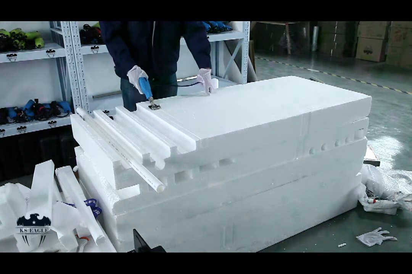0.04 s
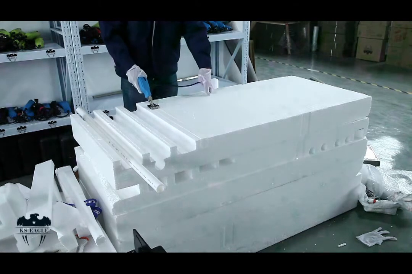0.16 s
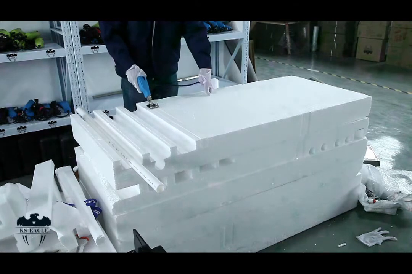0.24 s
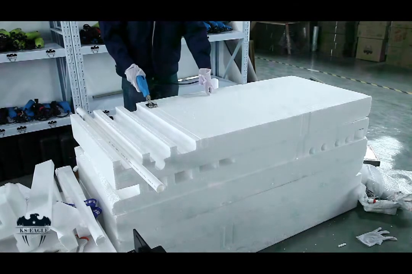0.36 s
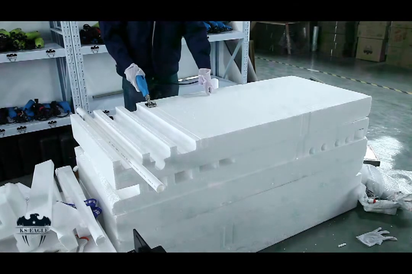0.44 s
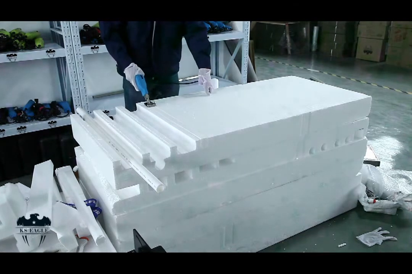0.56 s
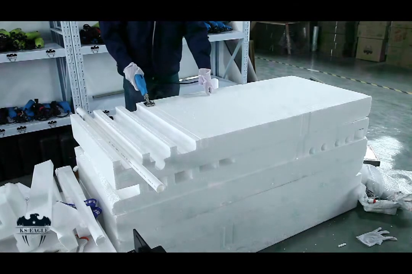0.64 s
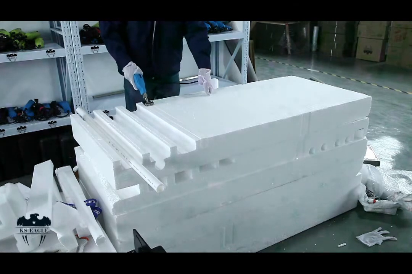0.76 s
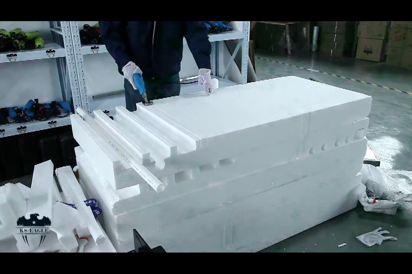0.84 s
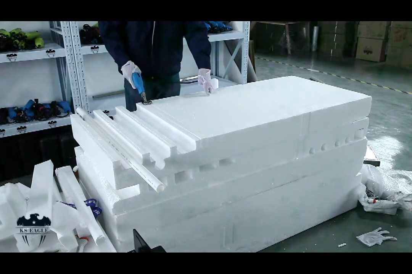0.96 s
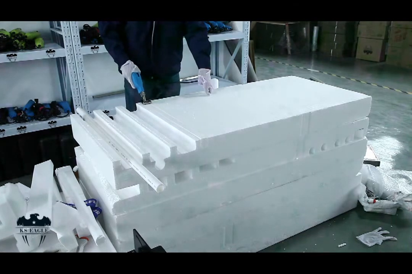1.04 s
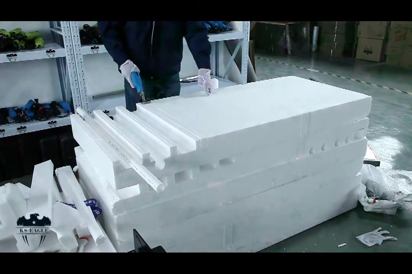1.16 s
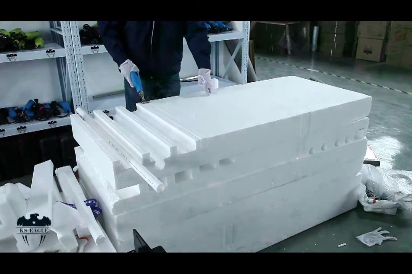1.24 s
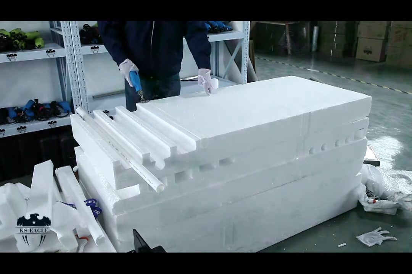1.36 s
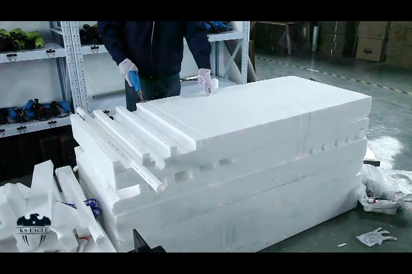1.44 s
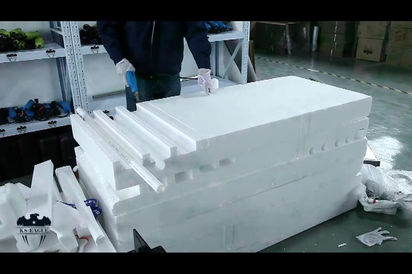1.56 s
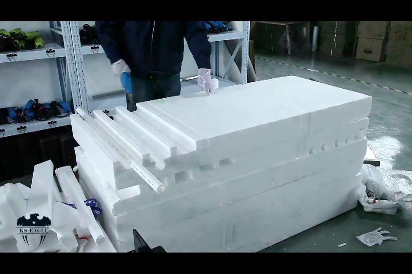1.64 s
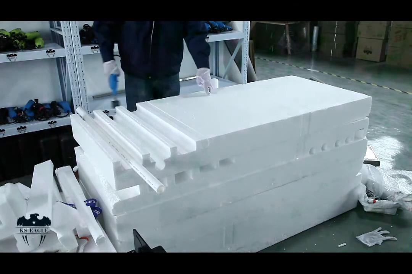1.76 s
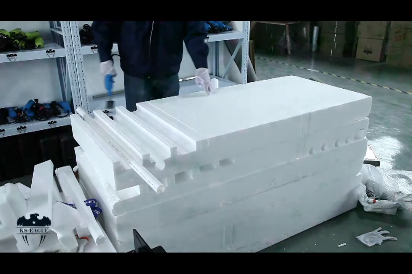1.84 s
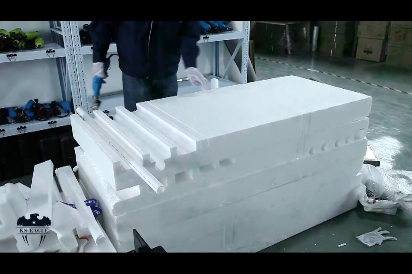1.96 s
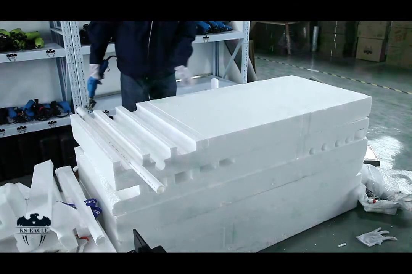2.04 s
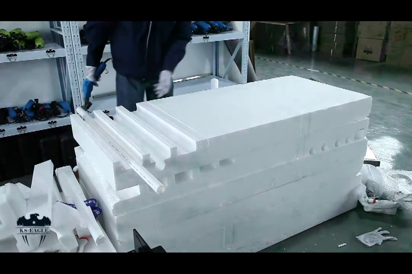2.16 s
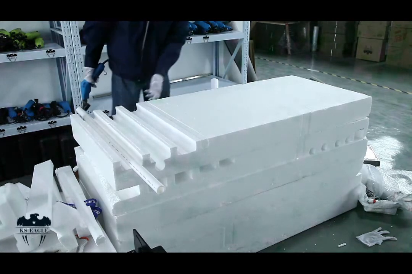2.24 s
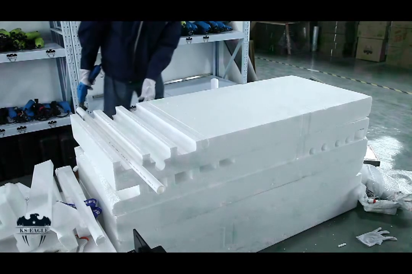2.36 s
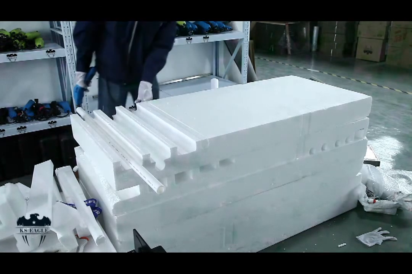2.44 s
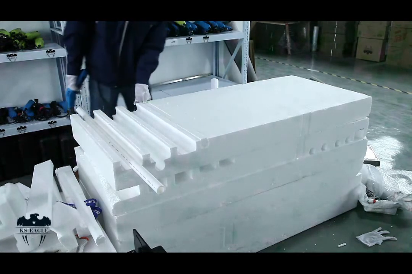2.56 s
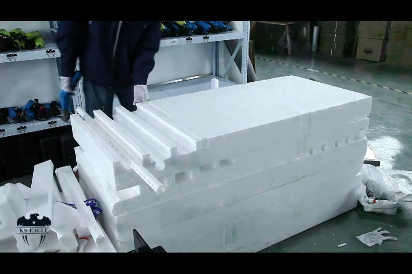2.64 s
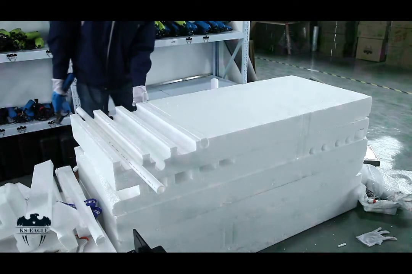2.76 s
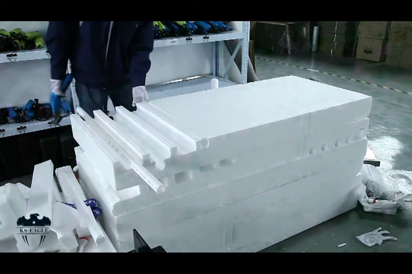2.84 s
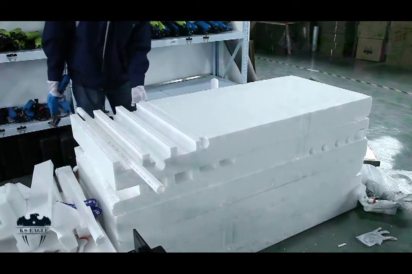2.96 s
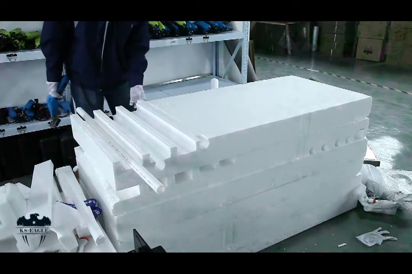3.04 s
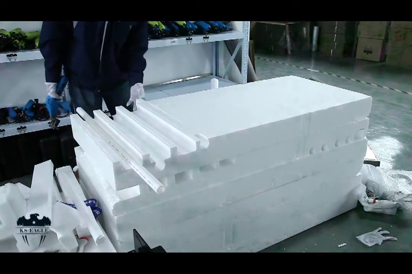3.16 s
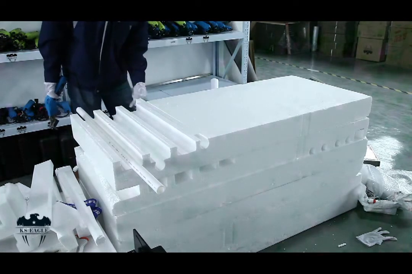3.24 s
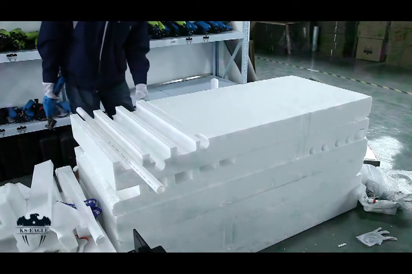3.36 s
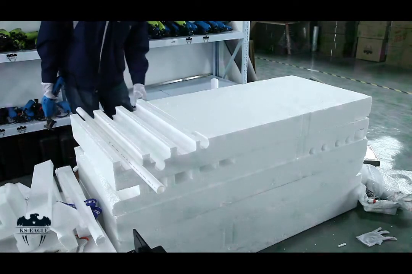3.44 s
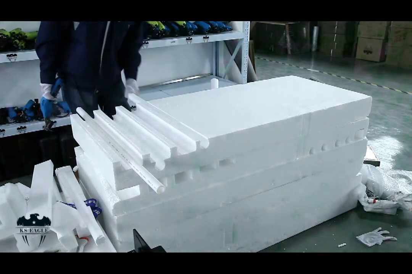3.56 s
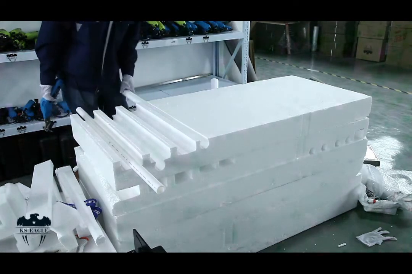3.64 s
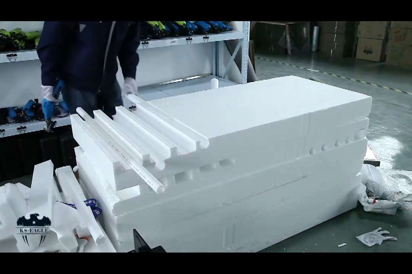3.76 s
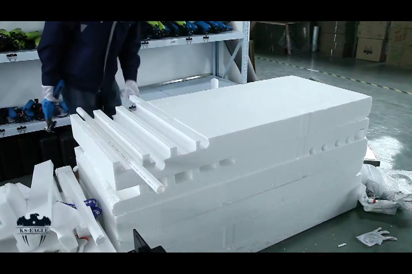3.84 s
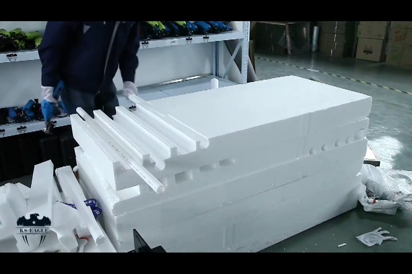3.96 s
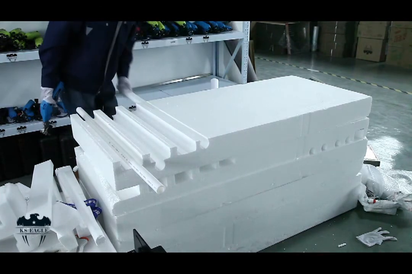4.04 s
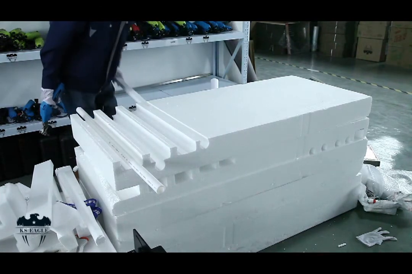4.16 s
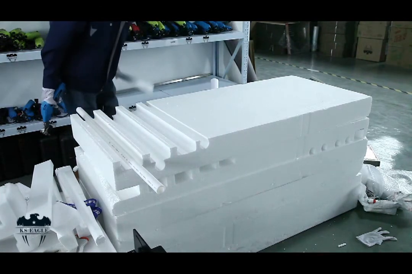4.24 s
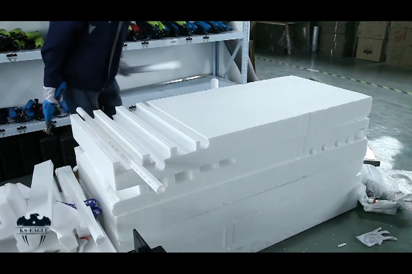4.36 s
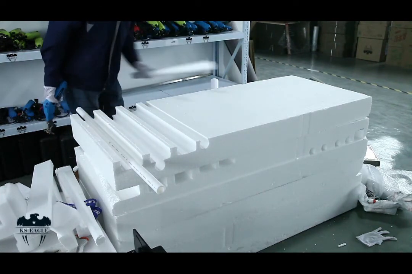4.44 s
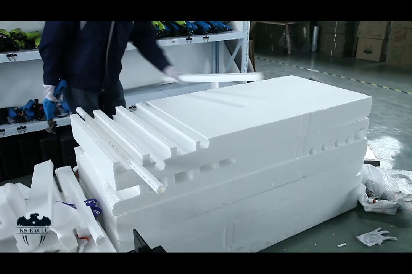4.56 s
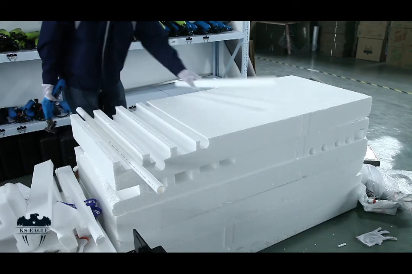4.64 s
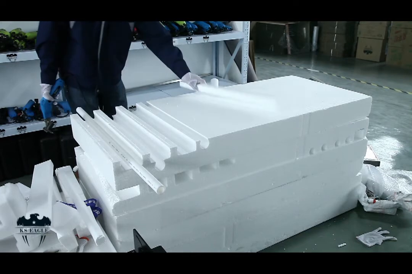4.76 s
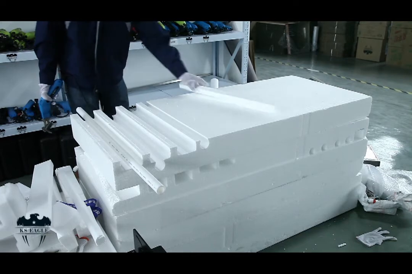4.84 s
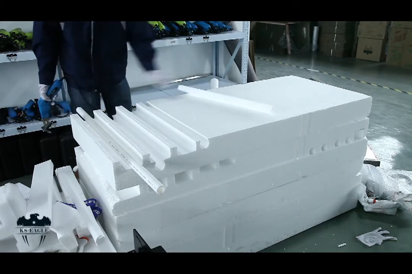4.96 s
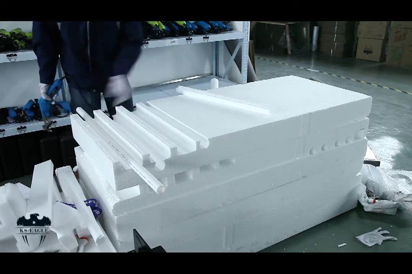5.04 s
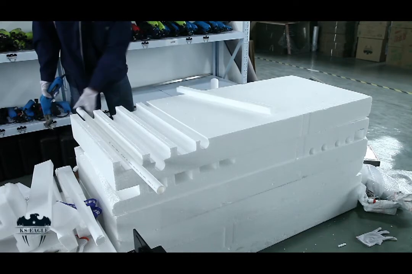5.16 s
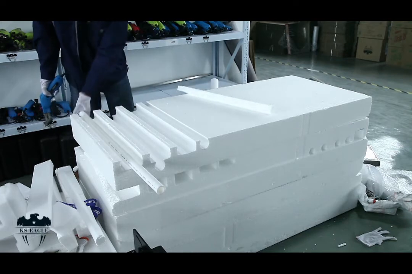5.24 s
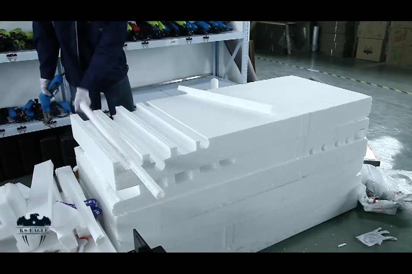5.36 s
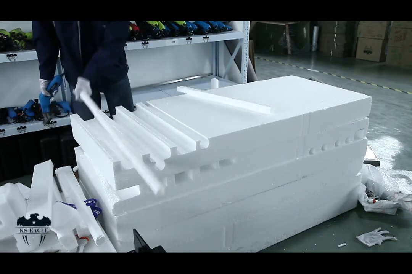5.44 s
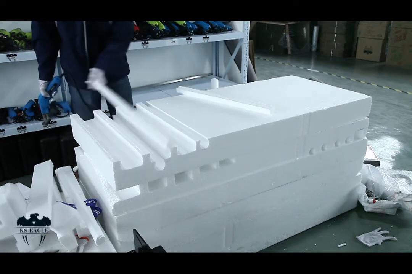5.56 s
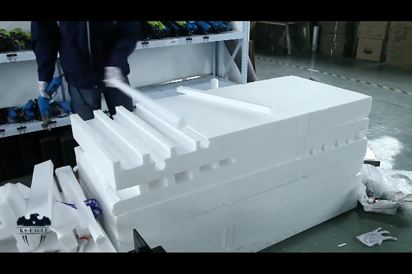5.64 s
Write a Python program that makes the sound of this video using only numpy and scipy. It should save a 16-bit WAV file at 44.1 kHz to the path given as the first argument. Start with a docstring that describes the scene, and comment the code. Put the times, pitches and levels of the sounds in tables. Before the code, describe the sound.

A hot blade fizzes softly through foam and snaps free, then loud squeaky polystyrene scrapes, a clattering light landing and one more short rub, in an echoing warehouse.

```python
"""Hot knife through polystyrene foam

In a warehouse a hot knife fizzes through a foam block, as cells burst, and leaves with a squeak of fast slips.
The strip is dragged free in four scrapes: random slips ring foam beads, body and fine grit.
Tossed onto the block, it lands as decaying modes and thuds; another short drag and light brushes follow.
Filtered noise reverberates for about a second over steady air and a wavering low hum."""
import sys
import numpy as np
from scipy import signal
from scipy.fft import rfft, irfft
from scipy.io import wavfile

SR = 44100
rng = np.random.default_rng(int(sys.argv[2]) if len(sys.argv) > 2 else 0)


def transcribe(signal):
    """Save signal, clipped to [-1, 1], as a 16-bit WAV file at the path in sys.argv[1]."""
    frames = np.atleast_2d(signal).T
    limited = np.clip(frames, -1, 1)
    pcm = np.round(limited * 32767).astype(np.int16)
    wavfile.write(sys.argv[1], SR, pcm)


N = 251811
TIME = np.arange(N) / SR

# Steady air of the hall: (frequency [Hz], relative density [dB per Hz])
HALL_AIR_SPECTRUM = [(30, -35), (60, -10), (100, -4), (200, -2.5), (280, -2), (420, -1.5), (650, -7),
                     (1000, -7.5), (2100, -10.5), (4000, -9), (6400, -5), (8000, -7.5), (10000, -18.5),
                     (15000, -25.5)]
HALL_AIR_RMS_DB = -67.5
# Hum while the knife cuts, and of the hall: (frequency [Hz], mean level [dB rms])
KNIFE_HUM_LINES = [(242, -75.5)]
HALL_HUM_LINES = [(150.7, -77), (231.5, -83.5), (656.8, -83.5)]

# Bursting cells: (frequency [Hz], relative density [dB per Hz])
FIZZ_SPECTRUM = [(60, -18), (150, -52), (270, -21), (500, -12.5), (800, -9.5), (2000, -8.5), (4500, -4.5),
                 (8000, -3), (10000, 3.5), (12000, 2), (14000, -6), (16000, -13.5)]
CUT_END_S = 1.535
FIZZ_START_DB, FIZZ_GROWTH_DB_PER_S = -56.3, 1.0
# Hollow of the cut: (multiple of slot pitch [ratio], width [Hz], relative level [dB])
SLOT_RESONANCES = [(1, 275, 0.5), (1.4, 510, -0.5), (2.151, 384, -2), (2.428, 300, -4)]
SLOT_START_HZ, SLOT_SAG_HZ_PER_S = 1500, 135
SLOT_PEAK_S, SLOT_PEAK_DB, SLOT_SWELL_DB_PER_S, SLOT_FADE_DB_PER_S = 0.94, -65.5, 14.5, 10.5
SLOT_LAG_S_PER_MULTIPLE = 0.18   # higher resonances peak later
# Melt spitting on the blade: (time [s], level [dB])
BLADE_SPITS = [(0.014, -52), (0.05, -57), (.1, -53.5), (0.427, -49.5)]
SPIT_S = 0.03
# Sputter as the blade breaks through the edge
BREAK_START_S, BREAK_LENGTH_S, BREAK_DB = 1.445, 0.089, -51
# Last cell walls snapping: (time [s], peak level [dB])
WALL_SNAPS = [(1.4364, -26.5), (1.454, -35), (1.4700, -22.5), (1.5287, -29.5)]
PUFF_S, PUFF_RE_SNAP_DB = .008, -18.5

# Reverberation: (frequency [Hz], t60 [s])
HALL_DECAY = [(100, 1.0), (500, 1.0), (1500, 0.99), (4000, 0.84), (7000, 0.52), (10000, 0.66),
              (15000, 0.51)]
FAR_WALL_S = 0.114

# Dull knocks on the block: (time [s], blow level [dB], contact cut-off [Hz])
BLOCK_KNOCKS = [(.497, -53, 140), (1.47, -56, 346), (1.79, -48, 1500), (4.785, -50.5, 700),
                (5.28, -54, 100)]
# Clear modes of the block: (frequency [Hz], relative level [dB], t60 [s])
BLOCK_MODES = [(79, -22, .14), (170, -7.5, 0.091), (240, -10, 0.032), (311, -13, 0.051), (395, -4.5, 0.058),
               (620, -8, 0.037)]
# Dense modes of the block: (frequency [Hz], relative density [dB per Hz])
BLOCK_THUD_SPECTRUM = [(35, -13), (80, -16), (180, 0.5), (420, 0), (520, -18.5), (650, -8.5), (900, -13),
                       (2000, -30), (8000, -26)]
# Rebound rule: (gap [s], gap growth [ratio], loss [dB], highest contact cut-off [Hz])
KNOCK_REBOUND = (.028, 1, 7, 250)
CRUSH_S, CRUSH_RE_KNOCK_DB = 0.0064, -8   # beads crushed by a knock

# Foam beads ringing: (frequency at pitch ratio 1 [Hz], width [Hz], relative level [dB])
BEAD_MODES = [(6160, 660, -0.5), (6690, 250, -2.5), (7270, 1000, 2), (5000, 670, -9.5), (8700, 6100, -20.5)]
# Body of rubbed foam: (frequency [Hz], relative density [dB per Hz])
RUB_SPECTRUM = [(50, -19), (180, -6.5), (400, -6), (560, -8.5), (920, -1.5), (1350, -7), (1800, -2),
                (3000, -0.5), (4200, 1), (6000, 0), (9000, -6), (15000, -30)]
# Fine torn grit: (frequency [Hz], relative density [dB per Hz])
GRIT_SPECTRUM = [(3000, -42), (7000, -9), (9500, 4), (11500, -3.5), (13500, -6.5), (16000, -24)]
# Glove and loose strip on foam: (time [s], length [s], bead level [dB], grit re beads [dB])
FOAM_BRUSHES = [(1.92, 0.081, -68, -6), (2.017, 0.088, -71, -11), (2.268, 0.071, -69.5, -26),
                (2.525, 0.04, -58, -11), (2.674, 0.23, -71, -10), (4.214, 0.16, -58, -18),
                (4.367, 0.19, -64, -7.5), (4.585, 0.03, -65.5, -6), (5.063, 0.17, -63.5, -15),
                (5.306, 0.11, -61.5, -40), (5.474, .16, -68.5, -26)]
# Foam catching and letting go: (time [s], bead level [dB])
FOAM_SNAGS = [(1.604, -53), (2.491, -58), (2.519, -56), (2.65, -54.5), (2.900, -39), (3.042, -36.5),
              (3.373, -49.5), (3.398, -45.5), (3.492, -39), (3.577, -39), (3.764, -49), (4.113, -40),
              (4.760, -50)]
# Length at the reference level; harder snags last longer, by a power of their strength
SNAG_S, SNAG_REF_DB, SNAG_STRETCH_POWER = .011, -50, 0.66
SNAG_GRIT_DB = -14
TOUCH_GRIT_TOP_HZ, TOUCH_BODY_LOW_HZ = 12500, 450

# Slip rate of the squeak: (at first [per s], at last [per s])
SQUEAK_SLIPS_PER_S = (760, 1650)
SQUEAK_START_S, SQUEAK_LENGTH_S, SQUEAK_DB = 1.580, .017, -40.5

# Foam dragged on foam: (start [s], rise [s], hold [s], release [s], bead level before tightening [dB],
# bead pitch [ratio], body at reference force [dB], body low edge [Hz], held strip ring re body [dB],
# freed strip ring re body [dB], grit at reference force [dB], room send [dB])
FOAM_DRAGS = [(2.752, .148, 0.19, 0.04, -38.5, 0.94, -16, 610, -7.5, -25, -14.5, -9.5),
              (3.387, 0.0049, 0.2, 0.18, -41.5, 0.99, -13, 55, -13.5, -21, -10.5, -12.5),
              (3.811, 0.035, 0.0069, 0.012, -44.5, 1, -14.5, 60, -21, -26, -15, -1),
              (3.872, .11, 0.13, 0.11, -38, 0.99, -12, 160, -24, -20, -5, -5),
              (5.214, 0.028, 0.03, 0.023, -52, 0.83, -12.5, 1700, -30, -26, -30, -2.5)]
DRAG_RANGE_DB, TIGHTEN_DB_PER_S = 17, 9.5
DRAG_EASE_IN_SHARE = 0.11   # of the rise
DRAG_SLIPS_PER_S = 9000
FORCE_REF_DB = -25.5   # drag level counted as reference force
FREED_HZ, FREED_WIDTH_HZ = 1182, 300

# Strip landing on one end, then the other, then a softer echo of the blow from the far wall:
# (time [s], blow level [dB], contact cut-off [Hz])
STRIP_BLOWS = [(4.760, -40, 2820), (4.785, -40, 5000), (4.885, -47.5, 1410)]
# Clear modes of the strip: (frequency [Hz], relative level [dB], t60 [s])
STRIP_MODES = [(287, -11.5, 0.059), (389, -15.5, 0.1), (634, -6.5, 0.063), (798, -9.5, 0.045),
               (1150, -0.5, 0.038), (1650, -6, 0.0096), (2350, -11, .0028)]
# Dense modes of the strip: (frequency [Hz], relative density [dB per Hz])
STRIP_THUD_SPECTRUM = [(50, -15), (130, -5), (230, -0.5), (480, -4), (620, -1.5), (950, -5), (1200, -1),
                       (1700, -7.5), (3000, -18.5), (5000, -11), (9000, -9), (15000, -61)]
# Chatter rule: (first gap [s], gap growth [ratio], loss per touch [dB], highest contact cut-off [Hz])
LANDING_CHATTER = (.003, 1.8, 2.5, 1600)
# Far end slapping down flat: (time [s], peak level [dB])
STRIP_SLAPS = [(4.7851, -23.5), (4.7869, -32)]
# Slap colour: (frequency [Hz], relative density [dB per Hz])
SLAP_SPECTRUM = [(100, -17), (300, -19), (700, -1), (1200, 0), (3000, -2.5), (5000, -10), (8000, -16),
                 (15000, -42)]

CUTOFF_HZ = 15600


def from_db(db):
    """Decibels to gain."""
    return np.exp(np.asarray(db) * (np.log(10) / 20))


def rms_one(x):
    """Scale to unit rms."""
    return x / np.sqrt(np.mean(x ** 2) + 1e-20)


def butter(x, order, hz, kind="low"):
    """Butterworth filter."""
    return signal.sosfilt(signal.butter(order, hz, kind, fs=SR, output="sos"), x)


def at_hz(points, hz):
    """Read a table on a log-frequency axis."""
    f, value = np.transpose(points)
    return np.interp(np.log(np.maximum(hz, 1)), np.log(f), value)


def gate(start_s, end_s, edge_s):
    """One between two times, with edges centred on them."""
    return np.clip(np.minimum(TIME - start_s, end_s - TIME) / edge_s + .5, 0, 1)


def drift(knots_per_s):
    """Smooth random wander, rms 1."""
    knots = rng.standard_normal(int(N / SR * knots_per_s) + 3)
    return rms_one(np.interp(TIME * knots_per_s, np.arange(len(knots)), knots))


def colour(x, spectrum, size=8192):
    """Causal minimum-phase filter with the given spectrum; rms 1."""
    bins_hz = np.arange(size // 2 + 1) * SR / size
    cepstrum = irfft(np.log(from_db(at_hz(spectrum, bins_hz))))
    # Doubling the causal half of the cepstrum gives minimum phase
    kernel = irfft(np.exp(2 * rfft(cepstrum[:size // 2], size)))[:size // 2]
    return rms_one(signal.oaconvolve(x, kernel)[:N])


def resonate(x, hz, width_hz):
    """Two-pole resonance with peak gain near 1."""
    r = np.exp(-np.pi * width_hz / SR)
    numerator = np.array([1, 0, -1]) * (1 - r * r) / 2
    denominator = [1, -2 * r * np.cos(2 * np.pi * hz / SR), r * r]
    return signal.lfilter(numerator, denominator, x + 1e-18)


def resonate_twice(x, hz_1, hz_2, width_hz):
    """Two resonances in series."""
    return resonate(resonate(x, hz_1, width_hz), hz_2, width_hz)


def random_signs():
    """A random sign per sample."""
    return rng.choice([-1, 1], N)


def grains(per_s, spread_db):
    """Clicks at random moments, mostly small, a few large."""
    sizes = from_db(spread_db * np.minimum(rng.exponential(1, N), 4)) * random_signs()
    return sizes * (rng.random(N) < per_s / SR)


def bursts(rows, edge_share):
    """Envelope of short swells, powers added."""
    power = np.zeros(N)
    for start_s, length_s, db in rows:
        span = slice(max(int((start_s - length_s) * SR), 0), int((start_s + 2 * length_s) * SR))
        to_edge_s = np.minimum(TIME[span] - start_s, start_s + length_s - TIME[span])
        swell = np.clip(to_edge_s / (length_s * edge_share) + .5, 0, 1)
        power[span] += (from_db(db) * swell) ** 2
    return np.sqrt(power)


def hum(lines, waver_db):
    """Tones with randomly wavering levels."""
    tones = 0
    for hz, db in lines:
        gain = from_db(db + waver_db * drift(11.0))
        tones = tones + gain * np.sqrt(2) * np.sin(2 * np.pi * hz * TIME)
    return tones


def background():
    """Coloured noise for the air; the knife's hum gives way to the hall's three tones."""
    air = from_db(HALL_AIR_RMS_DB) * colour(rng.standard_normal(N), HALL_AIR_SPECTRUM)
    knife_hum = hum(KNIFE_HUM_LINES, 0.74) * gate(-1, 1.607, 0.05)
    return air + knife_hum + hum(HALL_HUM_LINES, 0.7) * gate(1.55, 7, 0.22)


def gliding_band(centre_hz, width_hz):
    """Low-passed complex noise shifted to a moving centre; rms 1."""
    air = rng.standard_normal(N) + 1j * rng.standard_normal(N)
    air = butter(air, 2, width_hz / 2)
    return rms_one(np.real(air * np.exp(2j * np.pi * np.cumsum(centre_hz) / SR)))


def slot_hiss():
    """Vapour hisses through the slot; its resonances waver and sag as the cut lengthens."""
    slot_hz = SLOT_START_HZ - SLOT_SAG_HZ_PER_S * TIME
    hiss = 0
    for multiple, width_hz, db in SLOT_RESONANCES:
        late_s = TIME - SLOT_PEAK_S - SLOT_LAG_S_PER_MULTIPLE * (multiple - 1)
        drop_db = np.maximum(-SLOT_SWELL_DB_PER_S * late_s, SLOT_FADE_DB_PER_S * late_s)
        band = gliding_band(multiple * slot_hz * (1 + .028 * drift(9)), width_hz)
        hiss = hiss + from_db(db) * from_db(SLOT_PEAK_DB - drop_db) * band
    return hiss


def crack(rows, spectrum):
    """Sharp pulses of one colour, each with its peak level."""
    pulse = colour(1.0 * (TIME == 0), spectrum)[:SR // 20]
    clicks = np.zeros(N)
    clicks[[round(s * SR) for s, db in rows]] = from_db([db for s, db in rows])
    return np.convolve(clicks, pulse / np.abs(pulse).max())[:N]


def hot_knife():
    """Tiny cells burst on the blade; vapour hisses, melt spits and the last walls snap."""
    fizz = from_db(FIZZ_START_DB + FIZZ_GROWTH_DB_PER_S * TIME) * colour(grains(16000, 2.2), FIZZ_SPECTRUM)
    cutting = (fizz + slot_hiss()) * gate(-1, CUT_END_S, 0.0068)
    breaking = bursts([(BREAK_START_S, BREAK_LENGTH_S, BREAK_DB)], 0.13)
    spits = [(s, SPIT_S, db) for s, db in BLADE_SPITS]
    puffs = [(s - PUFF_S / 2, PUFF_S, db + PUFF_RE_SNAP_DB) for s, db in WALL_SNAPS]
    sputter_level = np.hypot(breaking, bursts(spits + puffs, 0.28))
    sputter = sputter_level * colour(grains(14000, 3.0), FIZZ_SPECTRUM)
    return cutting + sputter + crack(WALL_SNAPS, FIZZ_SPECTRUM)


def hall(x):
    """Diffuse noise tail, shorter in the treble, with one swell as the far wall answers."""
    t = TIME[:3 * SR // 2]
    edges_hz = np.geomspace(50, 16000, num=13)
    white, tail = rng.standard_normal((2, len(t))), 0
    # Neighbouring bands use different noise
    for k, (low, high) in enumerate(zip(edges_hz, edges_hz[1:])):
        band = butter(white[k % 2], 2, [low, high], "band")
        tail = tail + band * from_db(-60 * t / at_hz(HALL_DECAY, np.sqrt(low * high)))
    far_wall = 1 + 0.5 * np.exp(-((t - FAR_WALL_S) / 0.0045) ** 2)
    tail = butter(tail * np.clip(t / 0.012, 0, 1) * far_wall, 2, 8500)
    return signal.fftconvolve(x, tail * np.sqrt(2 * np.log(1000) / SR))[:N]


def bounced(hits, rule, count):
    """Add weaker touches, their contact cut-off capped, after every hit."""
    gap_s, growth, loss_db, top_hz = rule
    delays_s = np.cumsum(gap_s * growth ** np.arange(count))
    touches = list(hits)
    for s, db, hz in hits:
        for k, delay_s in enumerate(delays_s):
            touches.append((s + delay_s, db - loss_db * (k + 1), min(hz, top_hz)))
    return touches


def strike(hits, modes, thud, thud_db, thud_t60, lowest_hz):
    """Soft contacts excite clear modes and a short dense thud; a light body radiates no deep bass."""
    out = np.zeros(N)
    t = TIME[:SR // 4]
    hz, mode_db, t60 = np.transpose(modes)[:, :, None]
    rings = np.sin(2 * np.pi * hz * t) * from_db(mode_db - 60 * t / t60)
    dense = colour(rng.standard_normal(N), thud)
    thud_decay = from_db(thud_db - 60 * t / thud_t60)
    signs = (-1) ** np.arange(len(modes))
    for s, db, contact_hz in hits:
        span = slice(round(s * SR), round(s * SR) + len(t))
        mode_gains = signs * from_db(4.0 * rng.standard_normal(len(modes)))
        blow = mode_gains @ rings + dense[span] * thud_decay
        out[span] += from_db(db) * butter(blow, 1, contact_hz)
    return butter(out, 3, lowest_hz, "high")


def block_knocks():
    """Dull blows on the block, each rebounding once."""
    hits = bounced(BLOCK_KNOCKS, KNOCK_REBOUND, count=1)
    return strike(hits, BLOCK_MODES, BLOCK_THUD_SPECTRUM, thud_db=-2.0, thud_t60=0.087, lowest_hz=50)


def foam_slips(per_s, clump_db):
    """Beads catch and let go in short clumps."""
    clumps = np.clip(drift(1100) + 1.9 * drift(130), -2, 2)
    return grains(per_s, 1.23) * from_db(clump_db * clumps)


def bead_ring(slips, pitch):
    """Every slip pushes each bead resonance one way or the other; rms 1."""
    rings = 0
    for hz, width_hz, db in BEAD_MODES:
        rings = rings + from_db(db) * resonate(slips * random_signs(), hz * pitch, width_hz)
    return rms_one(butter(rings, 2, [3600, 9800], "band"))


def brushes():
    """Light rubs and sudden snags ring beads, body and grit; knocks crush beads into grit alone."""
    slips = foam_slips(per_s=12000, clump_db=1.6)
    snags = [(s, SNAG_S * from_db(SNAG_STRETCH_POWER * (db - SNAG_REF_DB)), db, SNAG_GRIT_DB)
             for s, db in FOAM_SNAGS]
    rubs = list(FOAM_BRUSHES) + snags
    crushes = [(s, CRUSH_S, db + CRUSH_RE_KNOCK_DB) for s, db, contact_hz in BLOCK_KNOCKS]
    touch_level = bursts([(s, length_s, db) for s, length_s, db, grit_db in rubs], 0.36)
    grit_rows = [(s, length_s, db + grit_db) for s, length_s, db, grit_db in rubs]
    grit_level = bursts(grit_rows + crushes, 0.29)
    grit = butter(colour(slips, GRIT_SPECTRUM), 2, TOUCH_GRIT_TOP_HZ)
    # Brief touches do not move the block at low frequencies
    body = butter(colour(slips, RUB_SPECTRUM), 2, TOUCH_BODY_LOW_HZ, "high")
    return touch_level * (bead_ring(slips, 0.94) + from_db(-8) * body) + grit_level * grit


def squeak():
    """The blade leaves in a quick run of nearly regular slips, speeding up."""
    end_s = SQUEAK_START_S + SQUEAK_LENGTH_S
    per_s = np.interp(TIME, [SQUEAK_START_S, end_s], SQUEAK_SLIPS_PER_S)
    count = np.floor(np.cumsum(per_s * (1 + .045 * drift(900))) / SR)
    slips = np.diff(count, prepend=0) / np.sqrt(per_s)
    voice = resonate(slips, 6800, 1600) + from_db(-8) * resonate(slips, 3160, 800)
    voice = butter(voice + resonate(slips, 5500, 5300), 2, 9000)
    return from_db(SQUEAK_DB) * rms_one(voice) * gate(SQUEAK_START_S, end_s, 0.0027)


def drag_level_db(start_s, rise_s, hold_s, release_s):
    """The pull builds up, tightens slowly while it holds, and lets go."""
    t = TIME - start_s - rise_s
    slack = np.maximum(-t / rise_s, 0) + np.maximum((t - hold_s) / release_s, 0)
    return TIGHTEN_DB_PER_S * np.clip(t, 0, hold_s) - DRAG_RANGE_DB * np.minimum(slack, 10)


def drag_body(slips, lowest_hz, held_db, freed_db):
    """Rubbed body plus rings of the strip, held at two pitches near an octave apart and sliding free."""
    body = rms_one(butter(colour(slips, RUB_SPECTRUM), 2, lowest_hz, "high"))
    held = slips * random_signs()
    held_ring = resonate_twice(held, 1700, 1730, 750) + from_db(-5.5) * resonate_twice(held, 870, 870, 320)
    freed_ring = resonate_twice(slips, FREED_HZ, FREED_HZ, FREED_WIDTH_HZ)
    return body + from_db(held_db) * rms_one(held_ring) + from_db(freed_db) * rms_one(freed_ring)


def pulls():
    """Foam dragged on foam: the same slips drive beads, body and grit; returns direct and room send."""
    direct, to_room = 0, 0
    for (start_s, rise_s, hold_s, release_s, db, pitch, body_db, lowest_hz,
         held_db, freed_db, grit_db, room_db) in FOAM_DRAGS:
        level_db = db + drag_level_db(start_s, rise_s, hold_s, release_s)
        slips = foam_slips(DRAG_SLIPS_PER_S, clump_db=1.06)
        body = drag_body(slips, lowest_hz, held_db, freed_db)
        # A harder drag tears more grit and rings beads more than body
        force_db = level_db - FORCE_REF_DB
        grit = from_db(grit_db + 0.28 * force_db) * colour(slips, GRIT_SPECTRUM)
        drag = bead_ring(slips, pitch) + from_db(body_db - 0.37 * force_db) * body + grit
        drag = from_db(level_db) * drag * gate(start_s, np.inf, DRAG_EASE_IN_SHARE * rise_s)
        direct = direct + drag
        to_room = to_room + from_db(room_db) * drag
    return direct, to_room


def strip_landing():
    """The tossed strip's ends strike, chatter and echo softly; its far end slaps down flat."""
    hits = bounced(STRIP_BLOWS, LANDING_CHATTER, count=4)
    blows = strike(hits, STRIP_MODES, STRIP_THUD_SPECTRUM, thud_db=-2, thud_t60=0.048, lowest_hz=200)
    return blows + crack(STRIP_SLAPS, SLAP_SPECTRUM)


def scene():
    """All sources share one hall, over the background; both channels alike."""
    knife, knocks, touches, squeal = hot_knife(), block_knocks(), brushes(), squeak()
    drags, drags_to_room = pulls()
    landing = strip_landing()
    to_room = drags_to_room + from_db(-1.5) * knife + from_db(-2.0) * touches
    to_room = to_room + from_db(-1.0) * squeal + from_db(0.5) * landing + from_db(-0.5) * knocks
    mono = knife + drags + touches + squeal + landing + knocks + hall(to_room) + background()
    return np.array([mono, mono])


def record(dry):
    """Steep elliptic low-pass."""
    return signal.sosfilt(signal.ellip(10, .1, 80, CUTOFF_HZ, fs=SR, output="sos"), dry)


dry = scene()
out = record(dry)
transcribe(out)
```